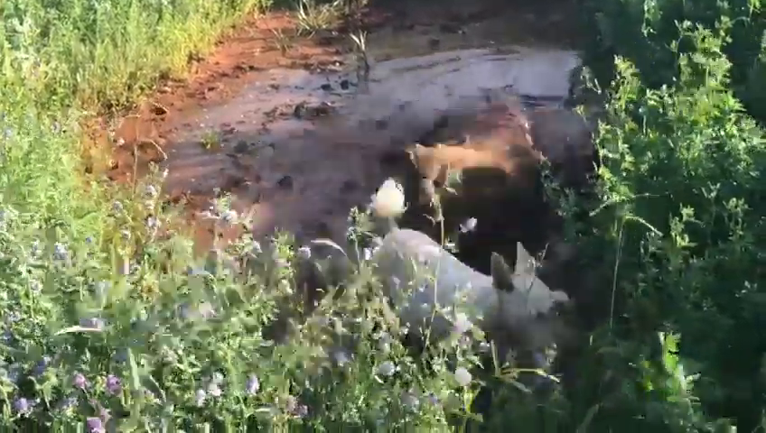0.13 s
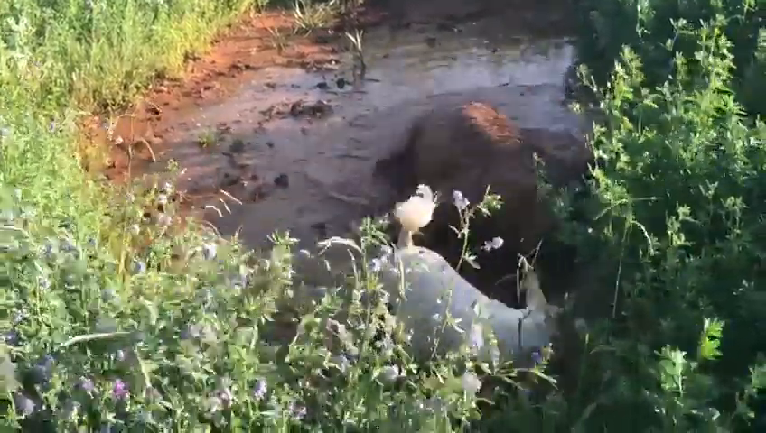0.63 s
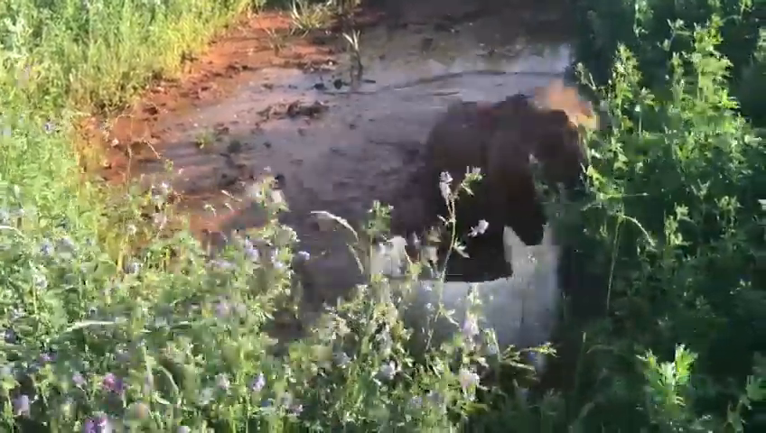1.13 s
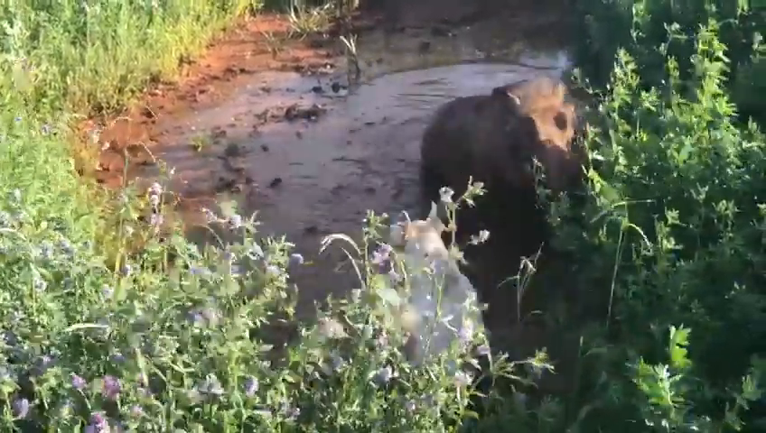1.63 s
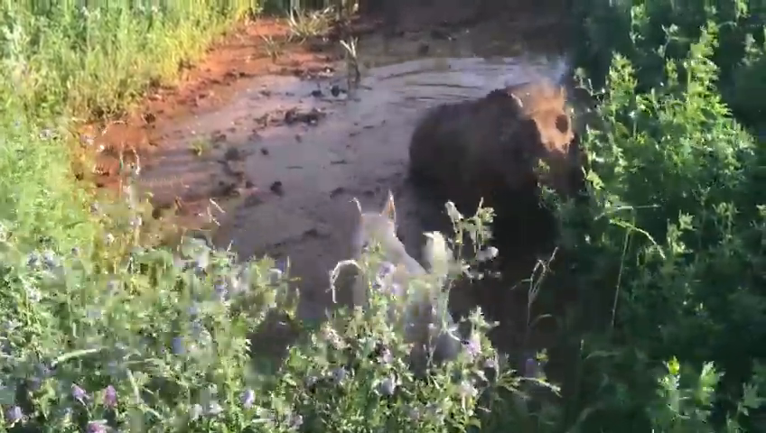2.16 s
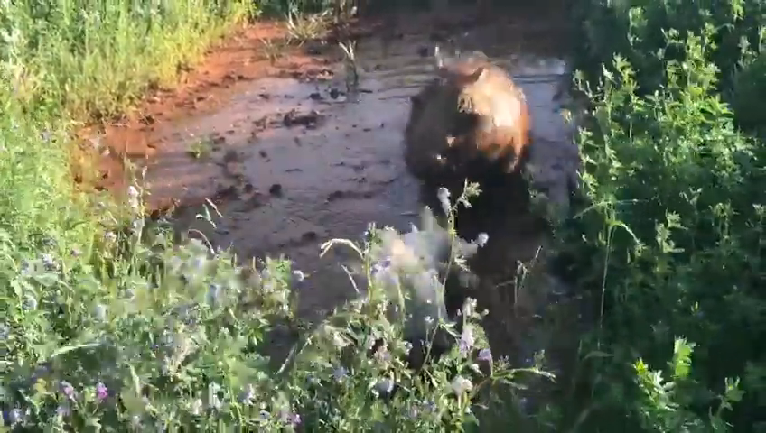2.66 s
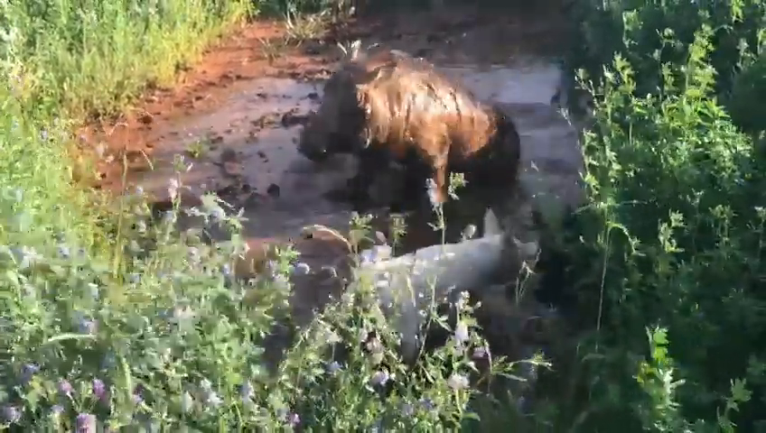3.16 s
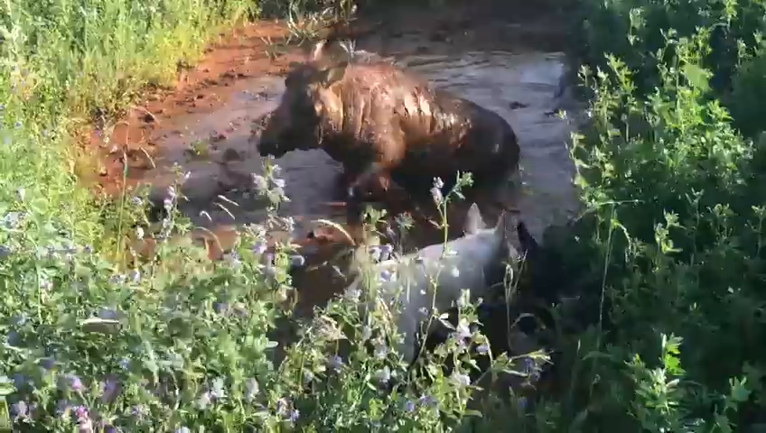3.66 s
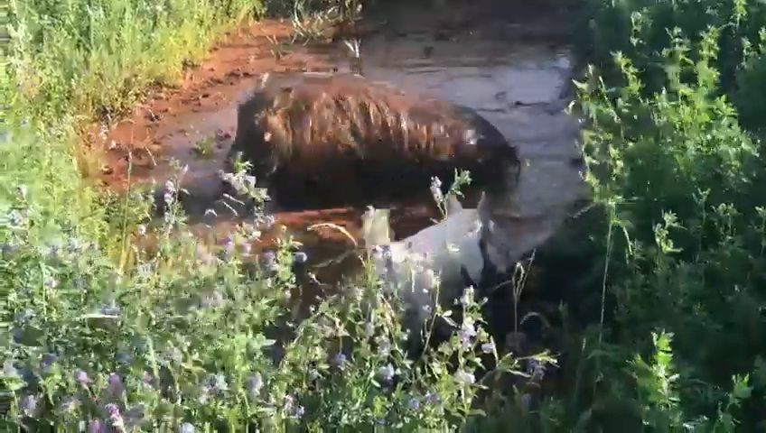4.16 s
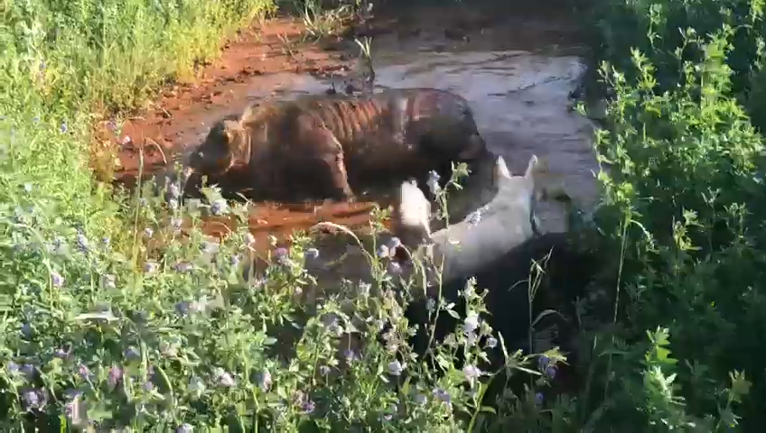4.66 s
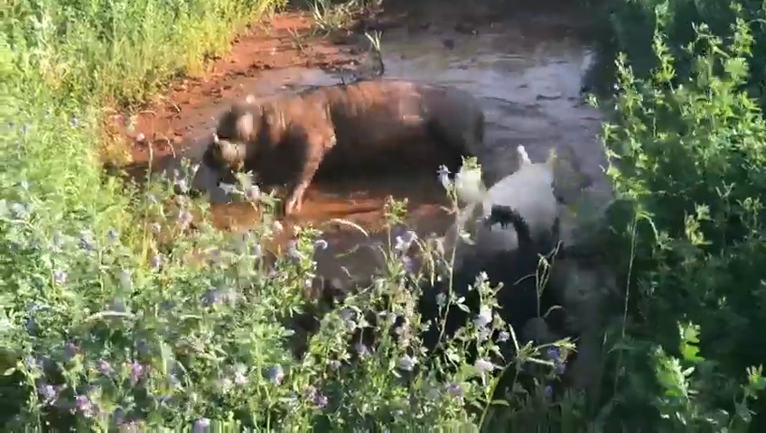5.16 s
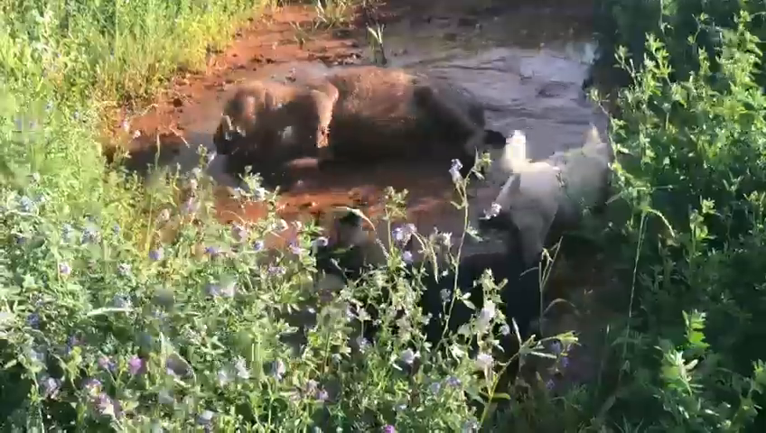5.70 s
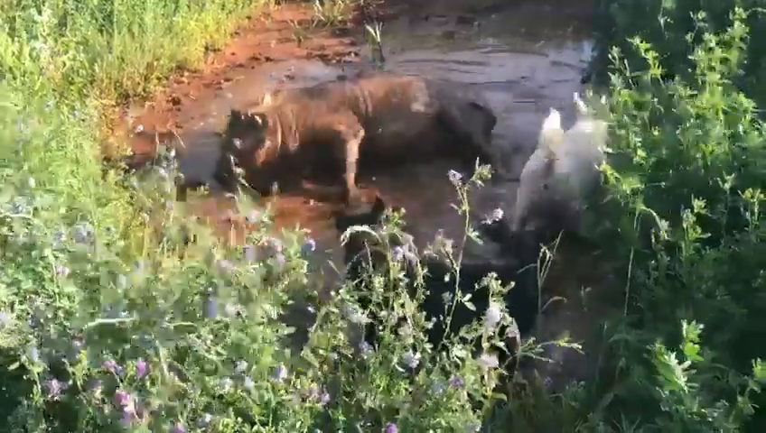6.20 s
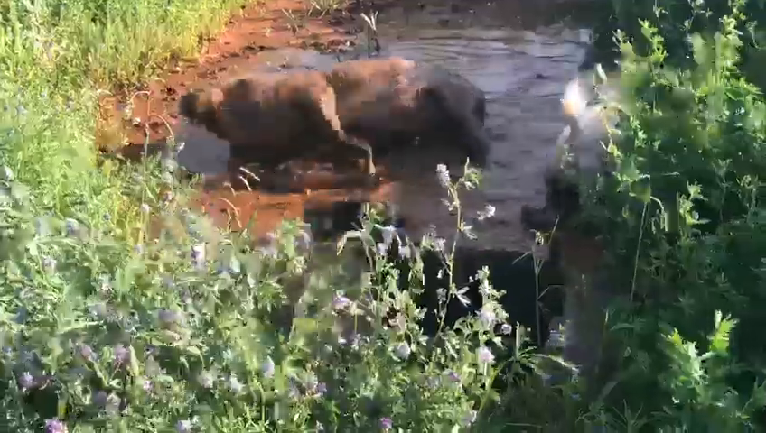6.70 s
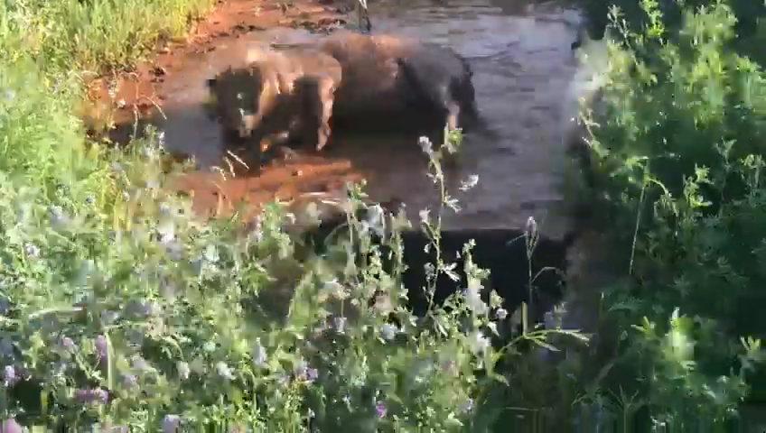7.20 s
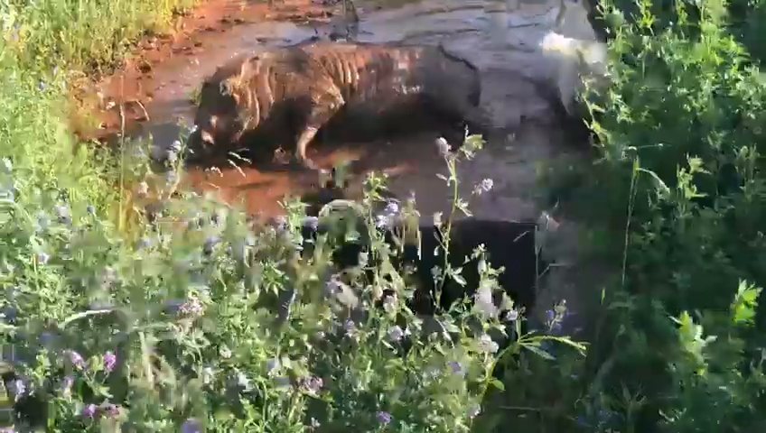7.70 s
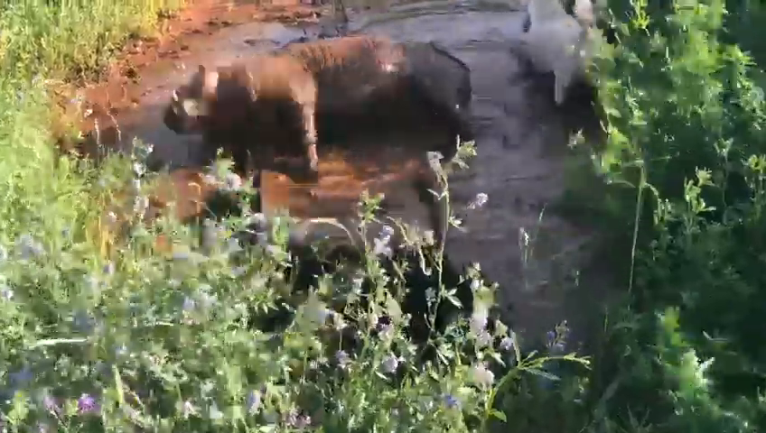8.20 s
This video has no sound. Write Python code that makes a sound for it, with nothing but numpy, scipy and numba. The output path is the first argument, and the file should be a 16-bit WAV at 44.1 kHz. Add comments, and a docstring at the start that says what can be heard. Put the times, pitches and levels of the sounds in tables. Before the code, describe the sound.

Pigs wallow in a shallow mud pool, splashing, sloshing and plopping irregularly while gusty wind thumps and buffets a handheld phone microphone.

```python
"""A shallow mud pool in a gusty breeze, where two animals wallow a few metres from a handheld phone.
Wind buffets the microphone port: uneven bands of low noise, with damped low tones for sharp puffs.
Churned water sloshes and patters as flickering noise; trapped air rings as short damped sines.
Hooves and flanks slap the water: noise bursts with a wet body and a volley of droplet ticks."""
import sys
import numpy as np
from scipy import signal
from scipy.fft import rfft, irfft
from scipy.io import wavfile
from scipy.ndimage import uniform_filter1d
from numba import njit

SR = 44100
rng = np.random.default_rng(int(sys.argv[2]) if len(sys.argv) > 2 else 0)


def put_to_file(sound):
    """Save the sound as 16-bit audio at rate SR, in the file named by the first command-line argument."""
    columns = np.atleast_2d(sound).T  # one column per channel
    safe = np.clip(columns, -1, 1)
    whole_steps = np.round(safe * 32767)
    wavfile.write(sys.argv[1], SR, whole_steps.astype(np.int16))


def elevation(decibels):
    """Turn decibel levels (scalar or array-like) into linear amplitude ratios."""
    levels = np.asarray(decibels, float)
    return 10 ** (levels / 20)


N = 367684
TIME = np.arange(N) / SR  # s


def on_log(table, hz):
    """Logarithmic frequency scale: read a (Hz, dB) table with equal ratios equally spaced."""
    f, db = np.transpose(table)
    return np.interp(np.log(hz + 1), np.log(f), db)


def curves(table):
    """Linear interpolation: columns of a table, one value a sample."""
    s, *columns = np.transpose(table)
    return [np.interp(TIME, s, c) for c in columns]


def unit(x):
    """Power normalisation: scale to rms 1."""
    return x / np.sqrt(np.mean(x ** 2))


def noise(lo_hz, hi_hz, order):
    """Filtered turbulence: a band of random noise, rms 1."""
    sos = signal.butter(order, [lo_hz, hi_hz], "band", fs=SR, output="sos")
    return unit(signal.sosfilt(sos, rng.standard_normal(N)))


def walk(rate):
    """Random modulation: levels held 1 / rate s, then smoothed twice; spread 1."""
    k = int(SR / rate)
    steps = np.repeat(rng.standard_normal(N // 64 + 1)[:N // k + 1], k)
    return unit(uniform_filter1d(uniform_filter1d(steps, k), k)[:N])


@njit
def ring(n, start, hz, cycles, rise, glide, size):
    """Damped resonance: sines that swell, decay over some cycles and drift in pitch as they fade."""
    out = np.zeros(n)
    for g in range(len(start)):
        step = hz[g] / SR
        phase = 0.
        end = min(n, start[g] + int(5 * cycles[g] / step))
        for i in range(start[g], end):
            turns = (i - start[g]) * step
            phase += 2 * np.pi * step * (1 + glide[g] * turns / cycles[g])
            envelope = (1 - np.exp(-turns / rise)) * np.exp(-turns / cycles[g])
            out[i] += size[g] * envelope * np.sin(phase)
    return out


def rings(s, db, hz, cycles, rise, glide):
    """Superposition of resonances: one damped sine for each row."""
    one = np.ones(len(s))
    return ring(N, (s * SR).astype(np.int64), 1. * hz, cycles * one, rise, glide * one, elevation(db))


def bursts(s, db, t60, rise_s):
    """Exponential decay: an envelope of rounded rises, each fading by 60 dB in t60 seconds."""
    env = np.zeros(N)
    for t, level, fade in zip(s, elevation(db), np.clip(t60 + 0 * s, .008, .3)):
        start = max(int((t - rise_s) * SR), 0)
        age = np.arange(min(int(fade * SR), N - start)) / SR
        rounded_rise = 1 - np.exp(-(age / rise_s) ** 2)
        env[start:][:len(age)] += level * rounded_rise * 1000 ** (-age / fade)
    return env


def swells(base_db, s, held_s, db, rise_db_per_s, fall_db_per_s):
    """Addition of powers: level in dB of a base with swells on it that rise, hold and fall."""
    t = TIME[::64, None]
    each = db - rise_db_per_s * np.maximum(s - t, 0) - fall_db_per_s * np.maximum(t - s - held_s, 0)
    power_over_base = (elevation(each - base_db[::64, None]) ** 2).sum(axis=1)
    return base_db + np.interp(TIME, t[:, 0], 10 * np.log10(1 + power_over_base))


# gusts on the port, levels before the trims of each eddy band: start_s, held_s, level_db
GUST_SWELLS = [(0.719, 0.15, -28), (1.09, 0.094, -36.5), (1.45, 0.047, -26.5), (1.56, 0.11, -34.5),
               (2.04, 0.16, -35), (2.53, 0.25, -35), (2.879, 0.21, -35), (3.24, 0.08, -33),
               (3.431, 0.07, -28.5), (3.61, 0.11, -31.5), (3.78, 0.032, -29.5), (3.91, 0.053, -37.5),
               (4.78, 0.051, -35.5), (4.96, 0.15, -44), (5.21, 0.057, -34), (5.47, 0.28, -39),
               (5.97, 0.16, -34.5), (6.44, 0.15, -41.5), (6.781, 0.071, -25.5), (7.202, 0.057, -26.5),
               (7.433, 0.14, -17), (7.641, 0.052, -21.5), (7.8, 0.14, -30), (8.08, 0.17, -29),
               (8.26, 0.14, -24.5)]


def gusty_eddies():
    """Turbulence: large eddies thump slowly; harder wind tears off small, spiky ones."""
    breeze_db = np.full(N, -44)
    large_db = swells(breeze_db, *np.transpose(GUST_SWELLS), rise_db_per_s=360, fall_db_per_s=250)
    eddy = np.tanh(.7 * walk(25) + .35 * walk(12))
    # eddies come as soft bumps with deep lulls between them
    flurry_db = 4 * eddy + 10 * np.minimum(eddy, 0)
    large = noise(46.7, 126.2, order=2)
    small = noise(162.6, 249.4, order=3) * unit(elevation(10 * np.tanh(.7 * walk(70))))
    # small eddies grow faster than the wind itself
    small_db = -9.5 + 0.27 * (large_db + 25.0)
    eddies = large + elevation(small_db + .5 * flurry_db) * small
    # only the hardest gusts shed a ragged rattle above them
    tearing = noise(267, 680, order=3) * unit(elevation(9.3 * walk(90)))
    tearing_db = -37.5 + 3.9 * (large_db + 21.0) + flurry_db
    return elevation(large_db + 2.5 + flurry_db) * eddies + elevation(tearing_db) * tearing


# sharp puffs of air into the port, levels before the trims of each part:
# start_s, level_db, thump_db (low thump over level_db)
PORT_PUFFS = [(0.304, -47, 30.5), (0.723, -13, -13), (0.773, -10, -5.5), (1.181, -24.5, -3),
              (1.451, -24.5, 8.5), (1.489, -10.5, -9.5), (1.569, -17, -2), (1.642, -26.5, -0.5),
              (1.693, -24, 5.5), (2.201, -32.5, -6), (2.256, -42, 15), (2.883, -19, -28), (2.927, -21, -3),
              (2.99, -17, 1), (3.237, -20, -7), (3.252, -14.5, -2), (3.437, -36, 17.5), (3.548, -20.5, -5),
              (3.903, -31.5, 14.5), (4.659, -26.5, -0.5), (4.79, -44.5, 24), (5.661, -36, 13),
              (5.777, -29.5, -11), (5.969, -22.5, -3), (6.028, -28, -2), (6.103, -36.5, 16),
              (6.219, -31, 10), (6.675, -23.5, 0.5), (6.772, -45, 27), (6.832, -40, 13), (6.898, -20, -12),
              (7.055, -26.5, 9.5), (7.202, -12.5, 5), (7.424, -29.5, 16), (7.472, -11, 6.5),
              (7.524, -20, 8.5), (7.548, -14, -18), (7.57, -14, -29), (7.579, -13, -14), (7.595, -18, -13),
              (7.689, -17.5, 1), (7.804, -22, -32), (7.887, -24.5, -23), (8.161, -18, -23),
              (8.263, -12, -2), (8.295, -15.5, -5.5)]


def puffs():
    """Impulsive excitation: air hits the port outright as a noisy rush and damped low tones."""
    s, db, thump_db = np.transpose(PORT_PUFFS)
    thump_size, flap_size, whip_size = rng.random((len(s), 3)).T
    rush = bursts(s, db - 7.0, 0.065, rise_s=0.0029) * noise(344.2, 360, order=1)
    rush = signal.sosfilt(signal.butter(2, 800, fs=SR, output="sos"), rush)
    flap = rings(s, db + 7.5, 180 + 170 * flap_size, cycles=1.73, rise=0.87, glide=-0.13)
    thump_hz = 65 + 45 * thump_size
    thump = rings(s, db + thump_db + 12.5, thump_hz, cycles=0.43, rise=0.27, glide=0.065)
    # hard puffs whip across the port's edge with a short higher snap
    whip_db = db + .5 * (db + 17.5)
    whip = rings(s, whip_db, 430 + 300 * whip_size, cycles=2.5, rise=2.1, glide=-0.15)
    return thump + flap + whip + rush


def wind():
    """Superposition: the steady eddies and the puffs add at the port."""
    return gusty_eddies() + puffs()


# churned water, levels before the wash of slaps and the trims of each layer:
# start_s, bubbling_db, spray_db (spray over bubbling_db)
CHURNED_WATER = [(0.0, -39.5, -10.5), (0.83, -37.5, -10.5), (1.41, -43.5, -13.5), (1.95, -48, -8.5),
                 (2.28, -54, -13), (2.32, -45, -13), (3.09, -41, -8.5), (3.6, -57.5, -10.5),
                 (3.7, -47.5, -10), (3.95, -43.5, -9.5), (4.42, -53, -12.5), (4.89, -42, -16.5),
                 (5.08, -49.5, -13), (5.44, -42, -16.5), (5.57, -50.5, -13.5), (6.1, -46.5, -13),
                 (6.52, -48, -16.5), (7.02, -47.5, -13.5), (7.38, -46.5, -5), (7.88, -48, -11.5),
                 (8.15, -45, -11), (8.33, -47.5, -10)]


def churning():
    """Energy transfer: each slap washes up the churned water, whose level then falls back."""
    churn_db, spray_db = curves(CHURNED_WATER)
    slap_s, crack_db, _ = np.transpose(WATER_SLAPS)
    wash_db = crack_db - 15
    churn_db = swells(churn_db, slap_s, 0, wash_db, rise_db_per_s=614, fall_db_per_s=146)
    return churn_db, spray_db


def dense_slosh(churn_db):
    """Incoherent summation: hard churning blends countless bubbles into dense noise."""
    slosh_db = -48.0 + 1.66 * (churn_db + 41.0)
    return elevation(slosh_db) * noise(553, 2230, order=2) * unit(elevation(3.8 * walk(60)))


# colour of spray, before scaling to its level: frequency_hz, level_db
SPRAY_COLOUR = [(500, -16), (1000, -1), (2200, 2), (3800, 1), (11000, -2), (12500, -9)]


def spray_hiss():
    """Spectral shaping: white noise takes on the colour of spray."""
    colour = elevation(on_log(SPRAY_COLOUR, np.arange(N // 2 + 1) * SR / N))
    return irfft(rfft(rng.standard_normal(N)) * colour, N)


def pattering(hiss, drop_s, drop_db, long, spray_db):
    """Droplet impact: gobs of water fall back as brief flashes of a flickering hiss."""
    patter = bursts(drop_s, drop_db - 2.5, .008 + .03 * long ** 2, rise_s=.002)
    flicker = unit(hiss * elevation(0.26 * walk(570)))
    return elevation(spray_db + 3.0) * flicker * unit(0.61 + patter)


# how loud bubbles of each size ring, before the churning sets their level: pitch_hz, level_db
BUBBLE_LOUDNESS = [(480, -18), (750, -8.5), (1300, 0.5), (2200, -1), (3300, 2), (6000, 8), (11500, 1)]


def bubbling(drop_s, drop_db, db, spray_db, count):
    """Bubble resonance: gobs trap clumps that ring and rise in pitch; the tiniest fizz with the spray."""
    parent, lag, size, loud, life = rng.random((count, 5)).T
    parent = (parent * len(drop_s)).astype(int)
    # bubbles of one gob are of much the same size: .45 of the range, wrapping at its end
    size = (rng.random(len(drop_s))[parent] + .45 * size) % 1
    s = np.minimum(drop_s[parent] - 0.013 * np.log(lag), (N - 1) / SR)
    lowest_hz, highest_hz = BUBBLE_LOUDNESS[0][0], BUBBLE_LOUDNESS[-1][0]
    hz = lowest_hz * (highest_hz / lowest_hz) ** size
    at = (s * SR).astype(int)
    fizz_share = np.clip(np.log2(hz / 2200), 0, 1)
    each_db = on_log(BUBBLE_LOUDNESS, hz) + db[at] + fizz_share * spray_db[at]
    # gentle churning traps few large bubbles
    each_db += (db[at] + 48.0) * np.clip(np.log2(1100 / hz), 0, 1)
    each_db += 13 * loud ** 3 + .55 * drop_db[parent]
    cycles = (1.0 + 5.1 * life ** 2) * (hz / 1000) ** 0.27
    return rings(s, each_db, hz, cycles, rise=0.66, glide=0.039)


# large bubbles near the surface, levels before the swell of each: start_s, level_db, starting pitch_hz
SURFACE_CHIRPS = [(1.922, -29.5, 760), (4.768, -33.5, 506)]


def rising_chirps(churn_db):
    """Rising resonance: large bubbles chirp upward near the surface, amid 160 scattered at random."""
    when, size, loud = rng.random((160, 3)).T
    s, db, hz = np.transpose(SURFACE_CHIRPS)
    scattered_db = churn_db[(when * (N - 1)).astype(int)] + 7 * loud ** 2
    s = np.r_[s, when * (N - 1) / SR]
    hz = np.r_[hz, 600 * 4 ** size]
    return rings(s, np.r_[db, scattered_db], hz, cycles=5.5, rise=2.5, glide=.14)


# single loud bubbles, levels before the swell of each: start_s, level_db, starting pitch_hz
LOUD_BUBBLES = [(0.836, -9.5, 966), (1.491, -17.5, 870), (1.714, -30, 1470), (1.795, -27, 1400),
                (2.042, -25.5, 1530), (2.436, -27, 1270), (2.676, -23, 1870), (2.773, -24, 1130),
                (3.057, -20.5, 1840), (3.106, -21.5, 1290), (3.701, -27, 1470), (3.88, -30, 885),
                (3.971, -22, 1330), (4.289, -20, 2120), (4.571, -20, 1340), (4.771, -29, 1740),
                (5.305, -29, 1120), (6.151, -26, 1130), (6.171, -21.5, 2220), (6.203, -27, 1110),
                (6.635, -29, 764), (6.836, -31, 1270), (6.858, -27, 1180), (7.257, -24, 1320),
                (7.278, -27, 1610), (7.354, -19, 1670), (7.366, -20, 1700), (8.116, -24, 1090)]


def plops():
    """Bubble resonance: single loud bubbles ring for a few cycles, barely rising in pitch."""
    s, db, hz = np.transpose(LOUD_BUBBLES)
    return rings(s, db, hz, cycles=2.75, rise=0.86, glide=0.013)


# slaps on the water, levels before the trims of each part:
# start_s, crack_db, body_db (wet body over crack_db)
WATER_SLAPS = [(0.5749, -24.5, 10.5), (0.7, -23.5, -14), (0.835, -19, 10), (0.936, -27.5, -10),
               (1.032, -20, -17), (1.0881, -24, 7.5), (1.289, -28, -18), (1.488, -34.5, 13.5),
               (1.566, -38, 24), (1.7415, -28.5, -4), (2.612, -33.5, 18.5), (2.6452, -28, -2),
               (2.772, -28, 1), (2.8685, -27.5, -24.5), (3.5688, -32.5, 13.5), (3.774, -30.5, -20),
               (3.8417, -31, -35.5), (4.485, -34, -19), (4.568, -23, 3.5), (4.586, -27.5, 7),
               (4.6754, -30.5, -23), (4.907, -29, -15), (5.422, -31, 10), (5.771, -44, 21.5),
               (6.173, -33, 11), (6.1944, -31, 12), (6.57, -34, 3), (6.836, -28.5, 7.5),
               (7.2566, -32.5, -18), (7.3659, -26.5, 9.5), (7.552, -29.5, -21), (7.62, -27.5, -17),
               (7.988, -28.5, -15), (8.1155, -29, 14)]


def wet_slaps():
    """Impact: each slap is a bright crack over a wet body, with a ragged volley of droplet ticks."""
    slap_s, crack_db, body_db = np.transpose(WATER_SLAPS)
    # harder slaps last longer
    t60 = .034 + .0006 * (crack_db + 30)
    rise_s = .0028
    crack_noise = noise(2800, 11500, order=1) * unit(elevation(5 * walk(400)))
    cracks = bursts(slap_s, crack_db - 5.5, t60, rise_s) * crack_noise
    lag, size, loud = rng.random((len(slap_s), 10, 3)).T
    tick_s = (slap_s - 0.012 * np.log(lag) - .002).ravel()
    tick_db = (crack_db + 1.5 - 24 * loud).ravel()
    tick_hz = (2000 * 5.5 ** size).ravel()
    ticks = rings(tick_s, tick_db, tick_hz, cycles=1.5, rise=0.38, glide=0.027)
    body_envelope = bursts(slap_s, crack_db + body_db - 13.0, 1.36 * t60, rise_s)
    return cracks + ticks + body_envelope * noise(220, 3150, order=2)


def water():
    """Superposition: slosh, spray and bubbles follow the churning; plops and slaps stand out on top."""
    churn_db, spray_db = churning()
    hiss = spray_hiss()
    # gobs of falling water, shared by the spray and the bubbles
    when, loud, long = rng.random((800, 3)).T
    drop_s = when * (N - 1) / SR
    drop_db = 18 * loud ** 3
    spray = pattering(hiss, drop_s, drop_db, long, churn_db + spray_db)
    bubbles = bubbling(drop_s, drop_db, churn_db - 5.0, spray_db, count=12000)
    slaps = wet_slaps()
    chirps = rising_chirps(churn_db)
    slosh = dense_slosh(churn_db)
    return slosh + spray + bubbles + slaps + plops() + chirps


def scene():
    """Superposition: water in front, wind at the port."""
    return (water() + wind())[None]


def roll_off(x):
    """The treble ends steeply here."""
    return signal.sosfilt(signal.butter(12, 12570, fs=SR, output="sos"), x)


def record(dry):
    """Band limiting and saturation: the phone cuts deep rumble and top, and rounds the loudest gusts."""
    x = signal.sosfilt(signal.butter(4, 42, "high", fs=SR, output="sos"), dry)
    ceiling = .45
    x = ceiling * np.tanh(x / ceiling)
    x = signal.sosfilt(signal.butter(12, 11700, fs=SR, output="sos"), x)
    return roll_off(x)


dry = scene()
out = record(dry)
put_to_file(out)
```